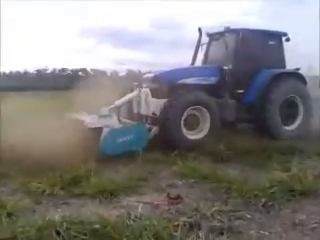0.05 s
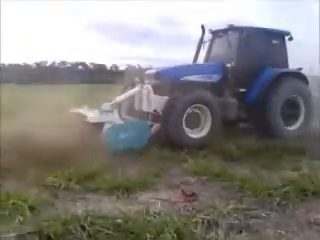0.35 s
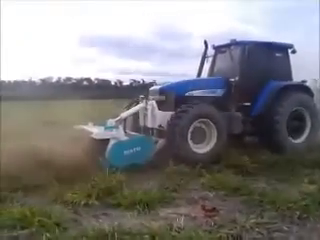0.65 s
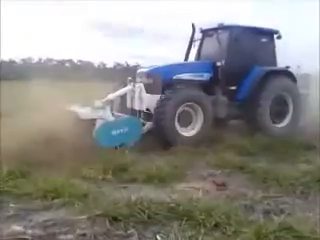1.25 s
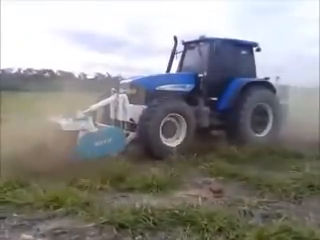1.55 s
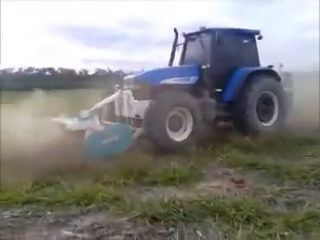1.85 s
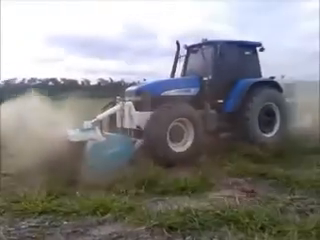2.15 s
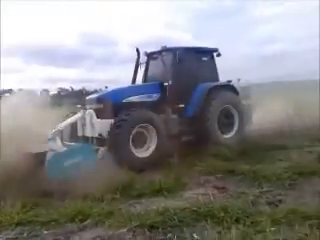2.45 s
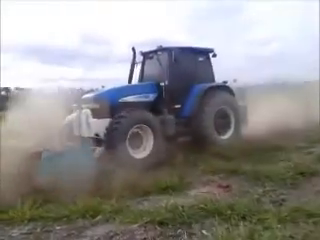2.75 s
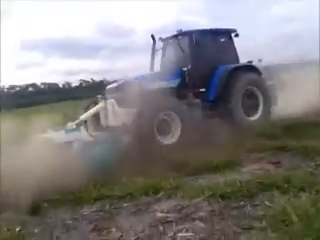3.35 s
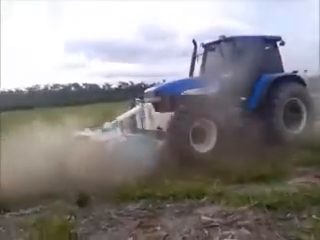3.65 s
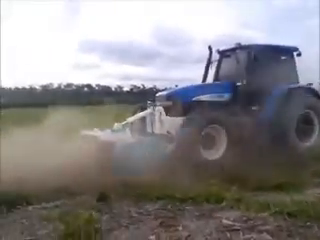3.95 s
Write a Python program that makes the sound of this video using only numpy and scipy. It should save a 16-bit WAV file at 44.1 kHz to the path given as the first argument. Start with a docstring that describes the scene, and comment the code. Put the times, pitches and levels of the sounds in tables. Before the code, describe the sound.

Steady roar of a diesel tractor and its spinning cutter shredding dry crop and flinging stones.

```python
"""A tractor drives a rotary cutter through a dry field, a few metres away. From the outset its
six-cylinder diesel drones, the rotor roars and pelts its steel hood with clods, stalks shred and straw
hisses. Almost at once tough stalks rasp and a stone clacks on the hood; both recur now and then.
The breeze swells at half a second, and late in the third second the rotor digs into bare soil and
sprays grit for about a second. All of it passes through a narrow-band recorder that clips tall peaks."""
import sys
import numpy as np
from scipy import signal
from scipy.fft import rfft, irfft
from scipy.io import wavfile

SR = 44100
rng = np.random.default_rng(int(sys.argv[2]) if len(sys.argv) > 2 else 0)


def store_pcm(level_fs):
    """Save levels as 16-bit WAV."""
    pcm = np.round(np.clip(level_fs, -1, 1) * 32767).astype(np.int16)
    wavfile.write(sys.argv[1], SR, np.atleast_2d(pcm).T)


N = 176400
SNAPS_PER_S = 5000  # breaking stalks, both shredded and rasping


def from_db(db):
    """The decibel scale: 20 dB is a factor of ten in amplitude."""
    return 10 ** (np.asarray(db) / 20)


def rms_one(x):
    """Normalisation to unit mean power."""
    return x / np.sqrt(np.mean(x ** 2) + 1e-20)


def in_time(rows):
    """Linear interpolation: each column after the time column, at every sample."""
    s, *columns = np.transpose(rows)
    return [np.interp(np.arange(N) / SR, s, c) for c in columns]


def drift(corner_hz):
    """Low-passed noise: a slow random wandering with a spread of 1."""
    hop, settling = 40, 2000  # samples per step; steps discarded
    pole = np.exp(-2 * np.pi * corner_hz * hop / SR)
    noise = rng.standard_normal(N // hop + settling + 2)
    slow = signal.lfilter([1], [1, -2 * pole, pole * pole], noise)[settling:]
    return np.interp(np.arange(N) / hop, np.arange(len(slow)), rms_one(slow - slow.mean()))


def coloured(x, spectrum):
    """Spectral shaping: a gain curve weights each frequency; rms 1."""
    hz, db = np.transpose(spectrum)
    bin_hz = np.maximum(np.arange(N // 2 + 1) * SR / N, 1)
    gain = from_db(np.interp(np.log(bin_hz), np.log(hz), db))
    return rms_one(irfft(rfft(x) * gain, N))


def impacts(per_s, spread_db):
    """A Poisson process: independent clicks of either sign, their sizes scattered by spread_db."""
    sizes = from_db(spread_db * np.minimum(rng.exponential(1, N), 4))
    signs = rng.choice([-1, 1], N)
    return sizes * signs * (rng.random(N) < per_s / SR)


def resonance(x, hz, t60):
    """A damped oscillator, whose ringing falls 60 dB in t60 seconds; rms 1."""
    r = from_db(-60 / (t60 * SR))
    return rms_one(signal.lfilter([1, 0, -1], [1, -2 * r * np.cos(2 * np.pi * hz / SR), r * r], x))


def engine():
    """Periodic excitation: exhaust tones lock to whole and half multiples of the firing rate."""
    # Speed sags and rises with the load. Each row: time in seconds, firings per second.
    firing = [(0, 106.3), (.5, 106.7), (.95, 107.5), (1.75, 108.7), (2.1, 108.2), (2.45, 107.5),
              (2.8, 107.9), (3.3, 107.4), (4, 107.0)]
    # Steady tones. Each row: multiple of the firing rate, level in dB.
    steady_orders = [(.5, -44.5), (1.5, -38), (2, -29), (2.5, -41), (4.5, -28), (7, -35), (7.5, -34),
                     (8, -35.5), (9, -37.5), (9.5, -35.5), (10, -39)]
    # The loudest tones swell and fade; late on, the fourth throbs three to four times a second.
    # Each row, under its multiple: time in seconds, level in dB.
    loud_orders = { 3: [(0, -38), (.4, -21), (1.3, -26.5), (2, -27.5), (3, -25), (4, -26)], 4: [(0, -29),
                   (.17, -16), (.45, -18.5), (.56, -19), (.72, -16), (1.05, -27), (1.3, -34), (1.6, -35),
                   (1.88, -14), (2.15, -26.5), (2.8, -25), (2.94, -13.5), (3.1, -33.5), (3.27, -15.5),
                   (3.4, -32.5), (3.52, -16.5), (3.62, -33), (3.78, -18.5), (4, -41)], 5: [(0, -24),
                   (.2, -14), (.38, -17), (.53, -31), (.78, -17.5), (1.03, -12), (1.43, -26.5), (1.6, -9.5),
                   (1.7, -24), (1.82, -20), (2.17, -14.5), (2.26, -34), (2.36, -17.5), (2.66, -20.5),
                   (2.83, -20.5), (3.1, -19.5), (3.38, -18.5), (3.8, -31), (4, -10.5)], 6: [(0, -39),
                   (.5, -30), (.73, -22.5), (.95, -26), (1.22, -19.5), (1.31, -21), (1.4, -10), (1.52, -32),
                   (1.65, -18), (1.85, -31), (2.7, -30), (2.98, -25.5), (3.15, -29), (4, -23.5)]}
    firing_hz, = in_time(firing)
    cycles = np.cumsum(firing_hz * (1 + 0.0011 * drift(9))) / SR  # slight speed jitter
    swelling_orders = [(multiple, in_time(curve)[0]) for multiple, curve in loud_orders.items()]
    out = np.zeros(N)
    for multiple, db in list(steady_orders) + swelling_orders:
        tone = np.sin(2 * np.pi * (multiple * cycles + rng.random()))
        waver = from_db(1.5 * drift(6))
        out += from_db(db) * rms_one(tone * waver)
    return out


def rotor():
    """Turbulence and modal ringing: churned air rumbles while soft clods excite the steel hood."""
    # The roar. Each row: time in seconds, relative levels of air and of hood in dB.
    roar = [(0, -16.5, -11), (.12, -15, -11.5), (.3, -18, -13.5), (.56, -14, -14.5), (.72, -15.5, -10),
            (1.0, -14.5, -11.5), (1.2, -18.5, -11.5), (1.42, -16.5, -10.5), (1.6, -15, -10),
            (1.9, -16.5, -10.5), (2.13, -17.5, -11.5), (2.28, -16.5, -12), (2.66, -17, -11.5),
            (2.85, -15.5, -11), (3.1, -18, -11.5), (3.42, -16, -9.5), (3.85, -15, -12.5), (4, -17, -9.5)]
    # The rumble. Each row: frequency in Hz, relative spectral density in dB.
    air_spectrum = [(100, -40.5), (112, -26.5), (145, -19), (187, -6), (235, -5.5), (340, 0.5), (420, 1),
                    (600, -5.5), (900, -11.5), (1500, -53.5)]
    # Hood resonances. Each row: frequency in Hz, relative level in dB, 60 dB decay time in seconds.
    hood_modes = [(381.6, -3, 0.03), (499, 0, 0.038), (562.4, 1, .04), (588, -2, 0.031), (655, 0, 0.082),
                  (737, -3.5, 0.045), (796, -9, 0.072), (901, -11, 0.026), (1003, -13, 0.049)]
    air_db, hood_db = in_time(roar)
    air = coloured(rng.standard_normal(N), air_spectrum)
    clods = impacts(per_s=1500, spread_db=0.5)
    ringing = np.zeros(N)
    for hz, db, t60 in hood_modes:
        drive = clods * rng.standard_normal(N)  # a clod excites each mode by a different amount
        ringing += from_db(db) * resonance(drive, hz, t60)
    band = signal.butter(2, [260, 1150], "band", fs=SR, output="sos")
    hood = rms_one(signal.sosfilt(band, ringing))
    return from_db(air_db + 2.45) * air + from_db(hood_db - 1) * hood


def debris(level, spectrum, per_s, spread_db, flutter_db):
    """Shot noise: dense, tiny snaps merge into a hiss whose level flutters."""
    level_db, = in_time(level)
    envelope = from_db(level_db + flutter_db * drift(7.8))
    return envelope * coloured(impacts(per_s, spread_db), spectrum)


def cutting():
    """Fracture and impact noise: stalks shred, straw hisses through the blades and grit sprays out."""
    # Loudness of each stream. Each row: time in seconds, relative level in dB.
    crop_level = [(0.0, -17.5), (0.14, -22), (0.65, -23.5), (1.15, -21), (1.43, -23.5), (1.6, -22.5),
                  (2.2, -19.5), (2.36, -22), (2.62, -21), (2.9, -22.5), (3.25, -21), (3.5, -22), (4.0, -20)]  # follows the crop fed in
    straw_level = [(0.0, -26), (0.12, -29.5), (0.15, -30.5), (1.0, -34), (2.18, -29), (2.24, -31.5),
                   (2.67, -31.5), (2.72, -26), (2.75, -33.5), (3.31, -33.5), (3.41, -31.5), (3.43, -33.5),
                   (3.95, -28.5), (4.0, -35)]
    grit_level = [(0, -42.5), (1.4, -49.5), (2.05, -34), (2.35, -40), (2.68, -26), (2.85, -26.5),
                  (3.42, -26), (3.7, -29.5), (4, -45)]  # strongest where the rotor digs into bare soil
    # Timbre of each stream. Each row: frequency in Hz, relative spectral density in dB.
    shred_spectrum = [(500, -9), (950, 5), (1200, 3), (1550, 0.5), (2200, 1), (2500, -4.5), (3050, -6.5),
                      (3450, -22.5), (4200, -20.5), (7000, -44.5)]
    straw_spectrum = [(1800, -10.5), (2650, -3), (3200, -1), (3700, -9), (4200, -0.5), (5150, 2.5),
                      (5700, -2), (6150, -3.5), (6600, -11.5), (7200, -27)]
    grit_spectrum = [(2000, -12.5), (3000, 3.5), (3900, -2.5), (4250, -11), (5500, 4), (6250, 2),
                     (6900, -3.5), (7500, -24.5)]
    stalks = debris(crop_level, shred_spectrum, per_s=SNAPS_PER_S, spread_db=1.4, flutter_db=-0.33)
    straw = debris(straw_level, straw_spectrum, per_s=9000, spread_db=2.0, flutter_db=0.37)
    grit = debris(grit_level, grit_spectrum, per_s=13000, spread_db=0.0, flutter_db=1.6)
    return from_db(1) * stalks + from_db(1.5) * straw + from_db(-1.7) * grit


def wind():
    """Turbulent pressure: a light breeze buffets the microphone, swells once and slowly drops."""
    # Strength of the breeze. Each row: time in seconds, level in dB.
    breeze = [(0, -47), (.48, -34), (.62, -43), (.9, -41), (1.2, -42), (1.95, -40.5), (2.7, -47.5),
              (4, -44.5)]
    # The buffeting. Each row: frequency in Hz, relative spectral density in dB.
    wind_spectrum = [(5, -9.5), (25, 4), (42, -1), (65, -8), (100, -12.5), (200, -31)]
    breeze_db, = in_time(breeze)
    return from_db(breeze_db + 1.5 * drift(3)) * coloured(rng.standard_normal(N), wind_spectrum)


def rasps():
    """Friction noise: tough bunches of stalks scrape round the hood in brief Gaussian swells."""
    # Each row: time of the peak in seconds, level in dB, half-width in seconds.
    scrapes = [(0.05, -26, 0.1), (2.03, -31, .06), (3.92, -34, .09)]
    # The scraping. Each row: frequency in Hz, relative spectral density in dB.
    rasp_spectrum = [(1400, -22.5), (2000, -3), (2350, -7.5), (2650, 12.5), (3100, -3.5), (3700, -21),
                     (4300, -6), (6000, -17.5)]
    t = np.arange(N) / SR
    swell = sum(from_db(db) * np.exp(-((t - peak) / width) ** 2) for peak, db, width in scrapes)
    return swell * coloured(impacts(SNAPS_PER_S, spread_db=2.0), rasp_spectrum)


def stones():
    """Impact transients: flung stones shatter on the hood in bright, exponentially decaying bursts."""
    # Each row: start in seconds, level in dB, centre frequency in Hz.
    strikes = [(.055, -22, 5100), (0.72, -27, 5440), (.772, -26.5, 5300), (1.394, -24.5, 4900),
               (2.212, -26.5, 3800), (2.71, -27, 5400), (2.983, -23, 5500), (3.4, -22, 5000),
               (3.526, -28, 5500)]
    t60_s, edge_ratio = 0.049, 1.06
    t, out = np.arange(N) / SR, np.zeros(N)
    for start, db, hz in strikes:
        decay = (t >= start) * from_db(-60 * np.maximum(t - start, 0) / t60_s)
        band = signal.butter(2, [hz / edge_ratio, hz * edge_ratio], "band", fs=SR, output="sos")
        out += from_db(db) * decay * rms_one(signal.sosfilt(band, rng.standard_normal(N)))
    return out


def scene():
    """Superposition: engine, cutter and breeze add in one channel."""
    return (engine() + rotor() + cutting() + rasps() + stones() + wind())[None]


def record(dry):
    """Band limiting and clipping: the tallest peaks overload the recorder with a soft crackle."""
    band_hz, crackle_top_hz, cutoff_hz, overload_level = 7100, 7750, 16000, 0.975
    band_filter = signal.cheby1(11, 0.1, band_hz, fs=SR, output="sos")
    crackle_filter = signal.ellip(10, 0.05, 70, crackle_top_hz, fs=SR, output="sos")
    output_filter = signal.cheby2(12, 70, cutoff_hz, fs=SR, output="sos")
    narrow = signal.sosfilt(band_filter, dry)
    overloaded = np.clip(narrow, -overload_level, overload_level)
    softened = signal.sosfilt(crackle_filter, overloaded)
    return signal.sosfilt(output_filter, np.clip(softened, -1, 1))


dry = scene()
out = record(dry)
store_pcm(out)
```